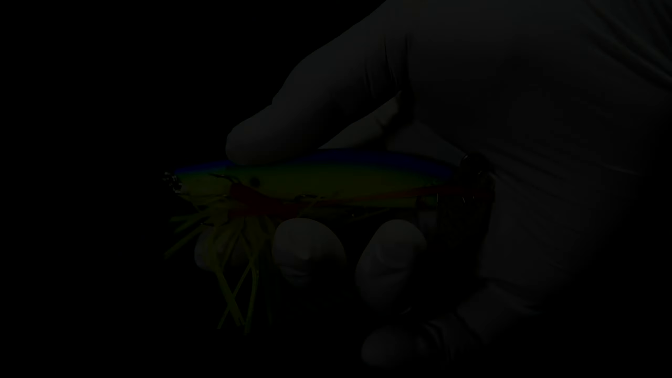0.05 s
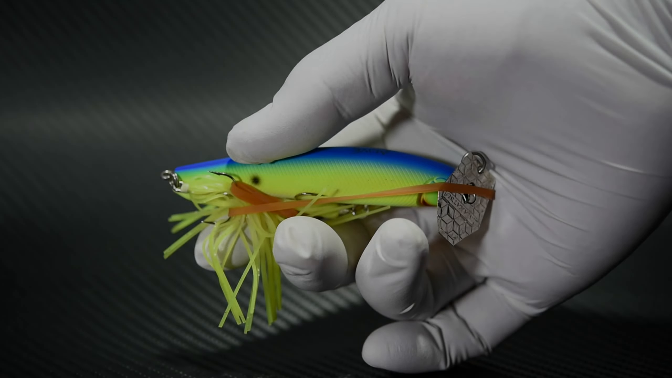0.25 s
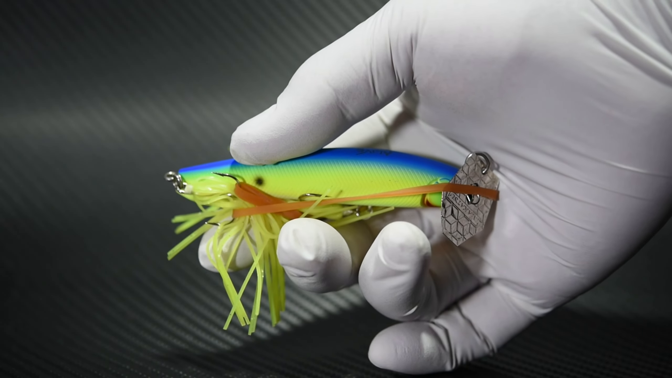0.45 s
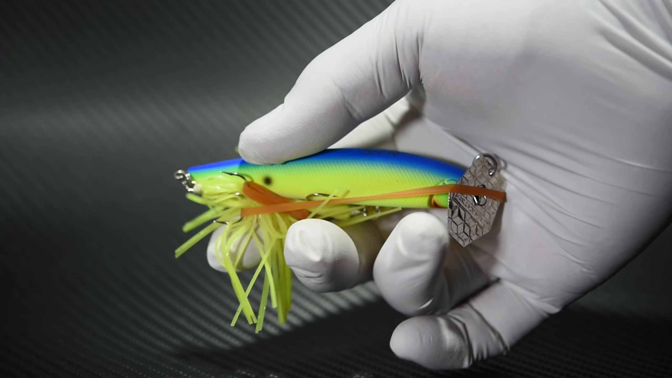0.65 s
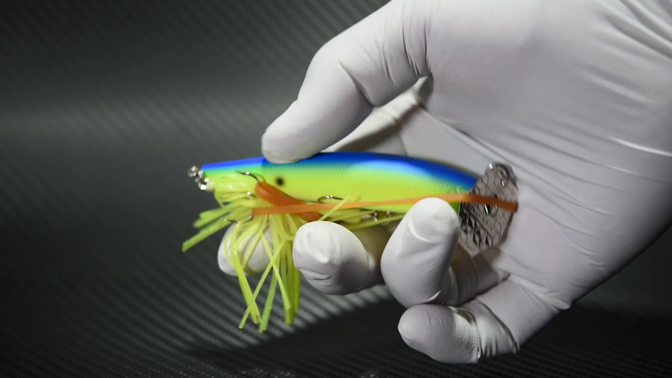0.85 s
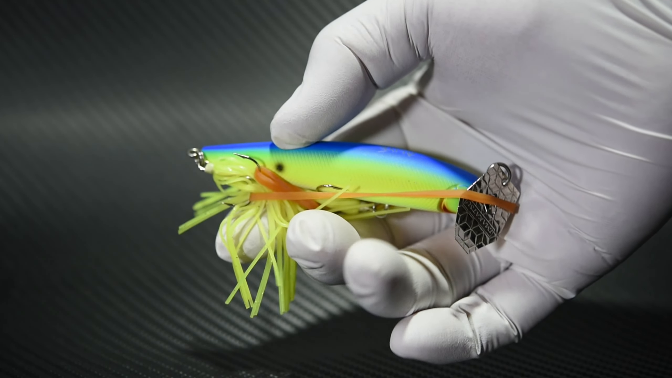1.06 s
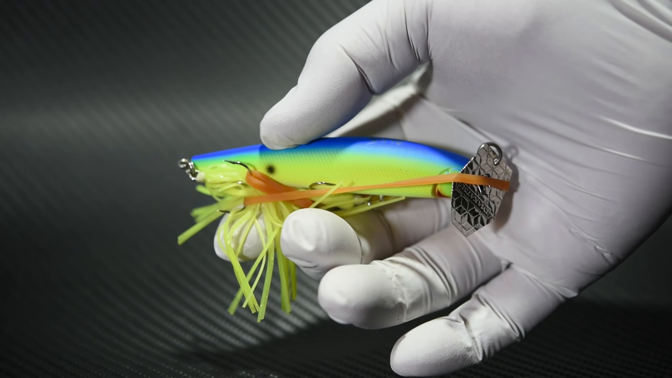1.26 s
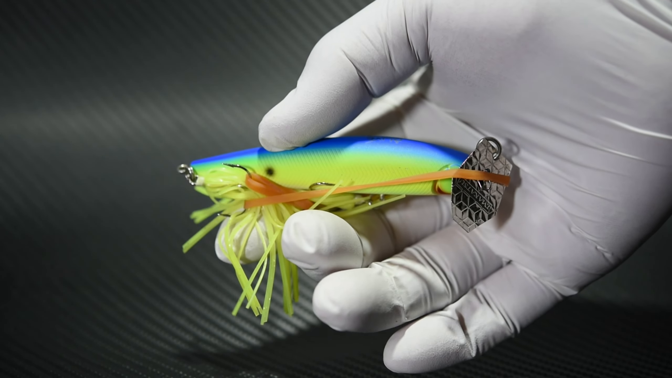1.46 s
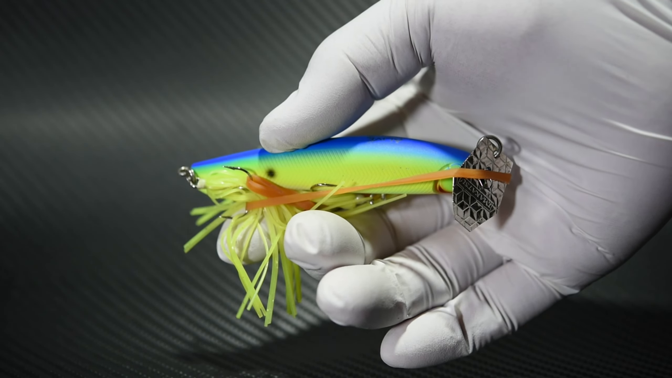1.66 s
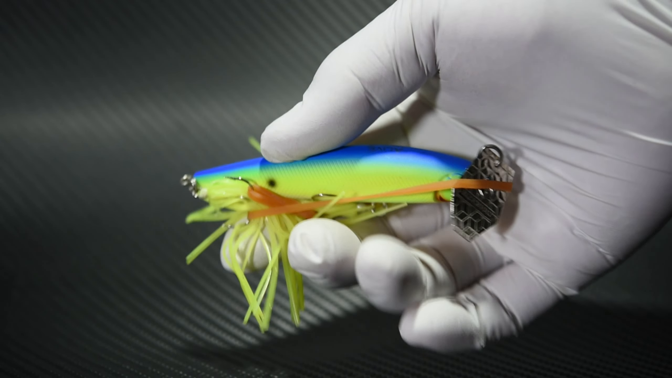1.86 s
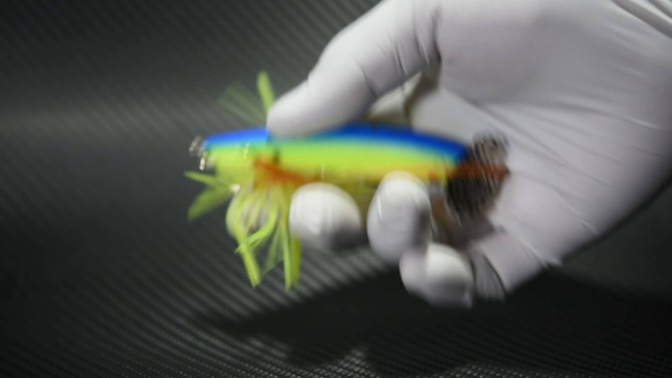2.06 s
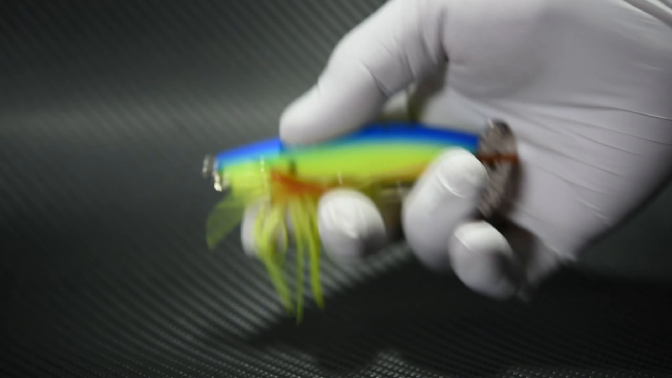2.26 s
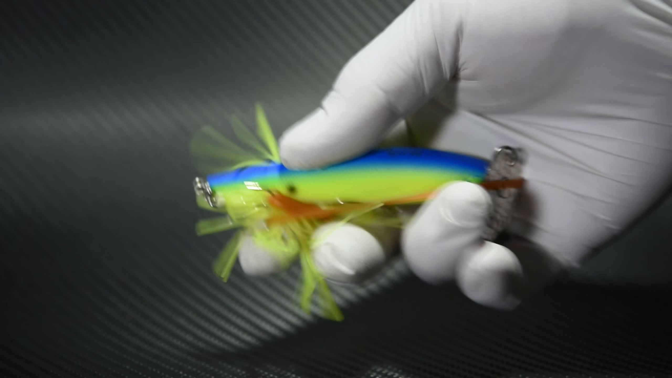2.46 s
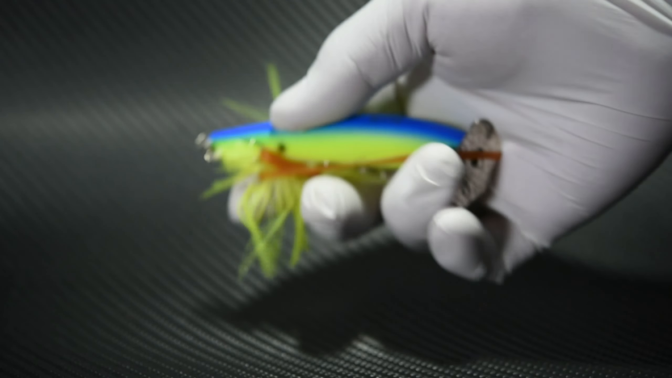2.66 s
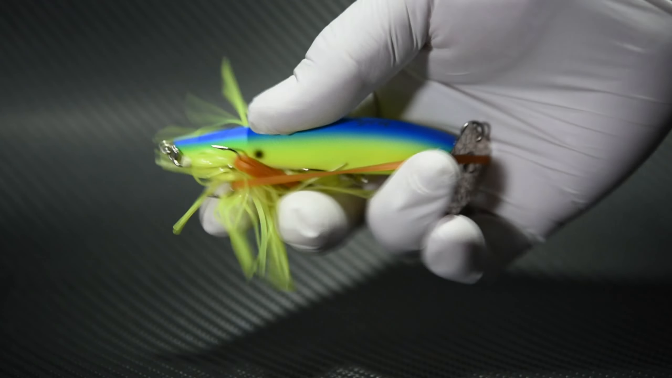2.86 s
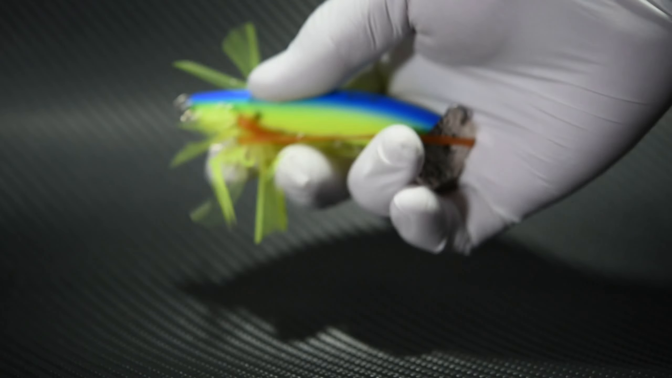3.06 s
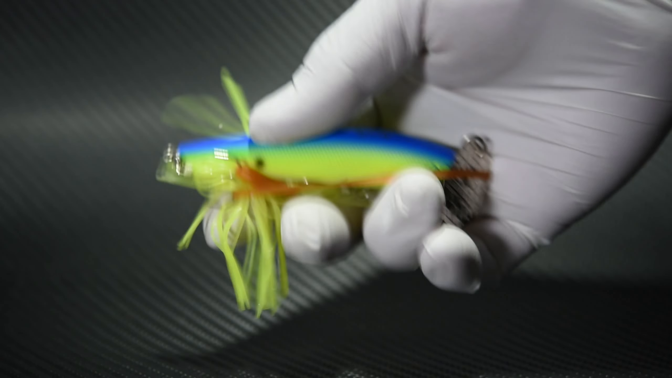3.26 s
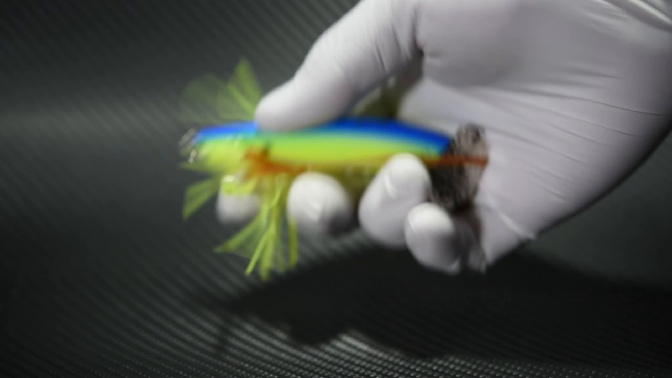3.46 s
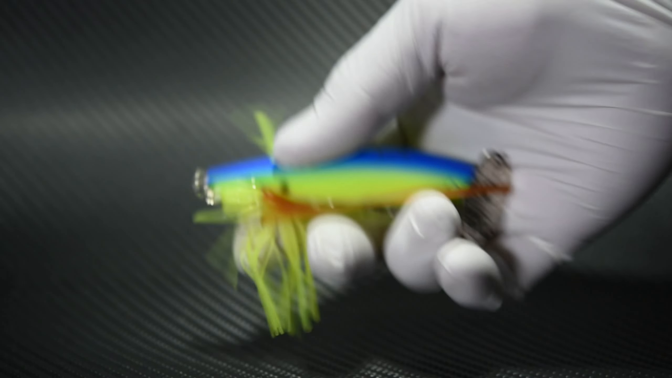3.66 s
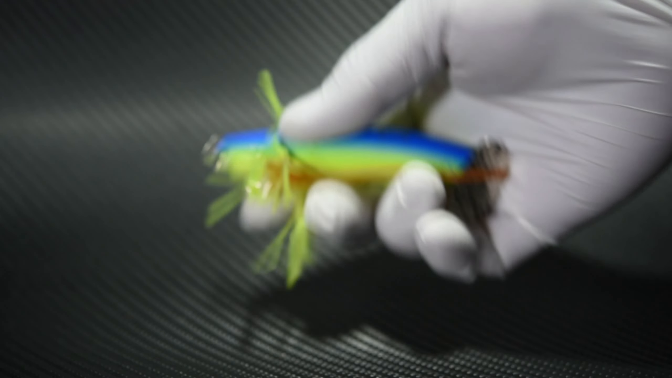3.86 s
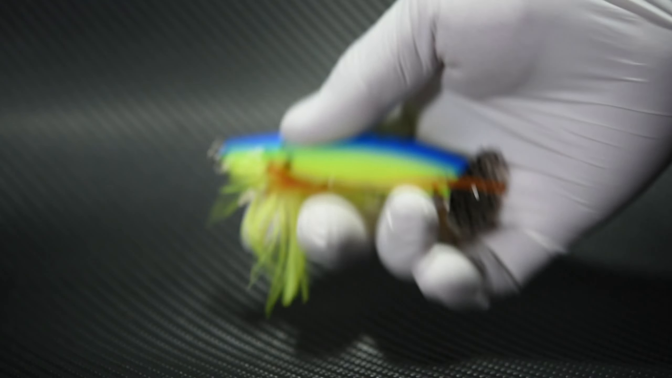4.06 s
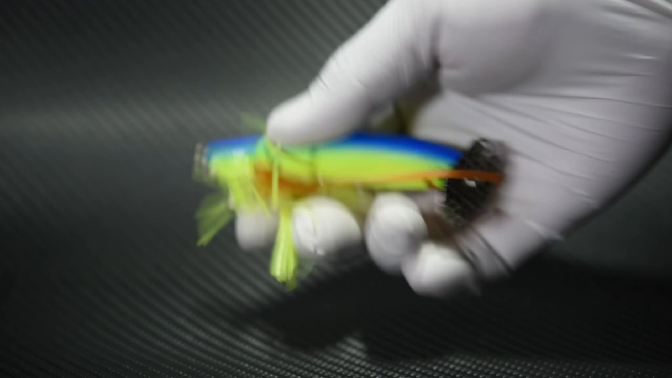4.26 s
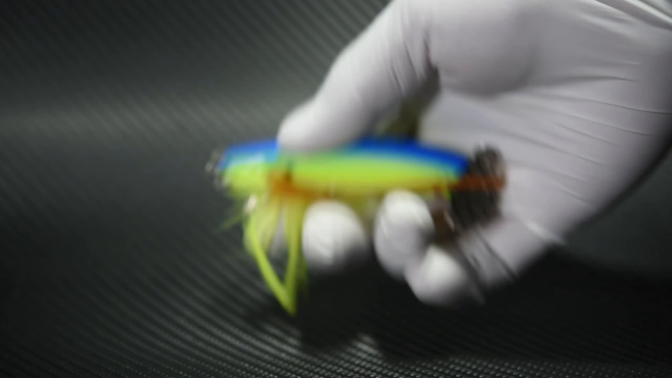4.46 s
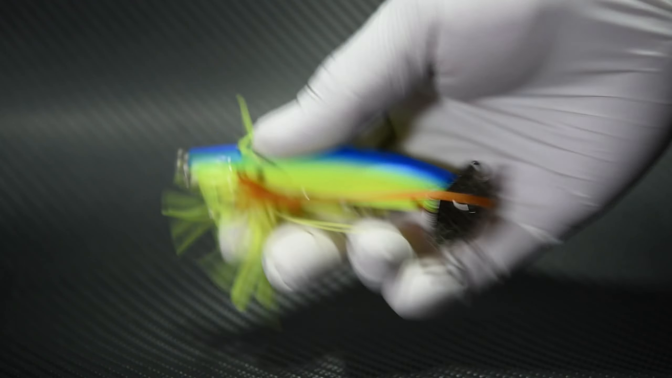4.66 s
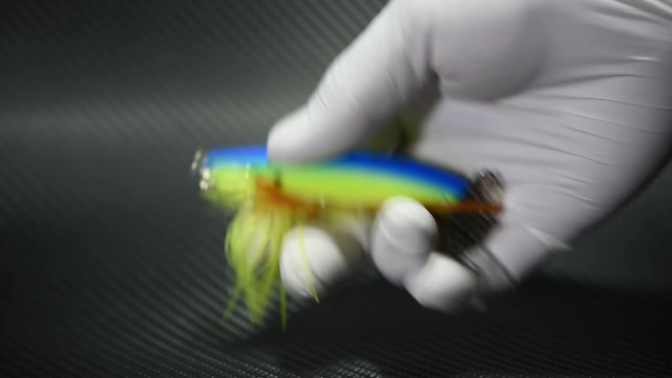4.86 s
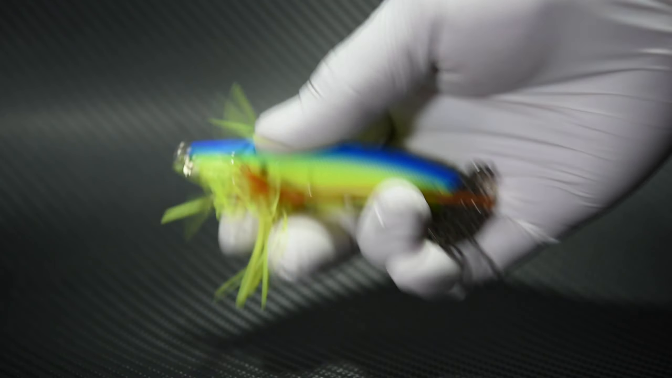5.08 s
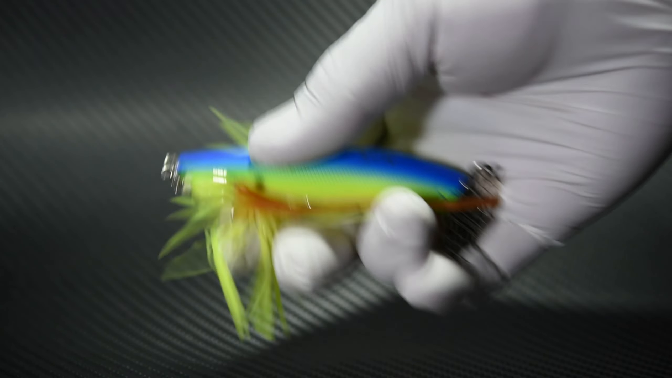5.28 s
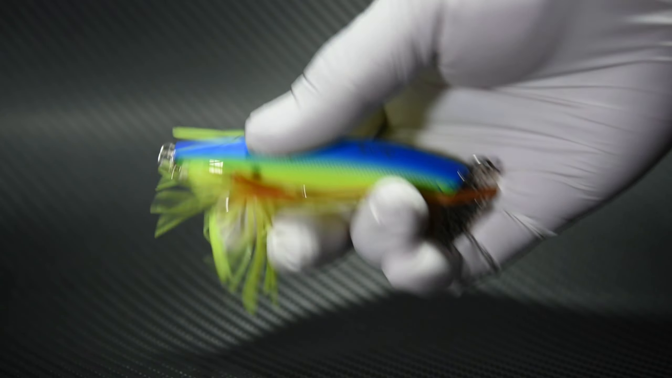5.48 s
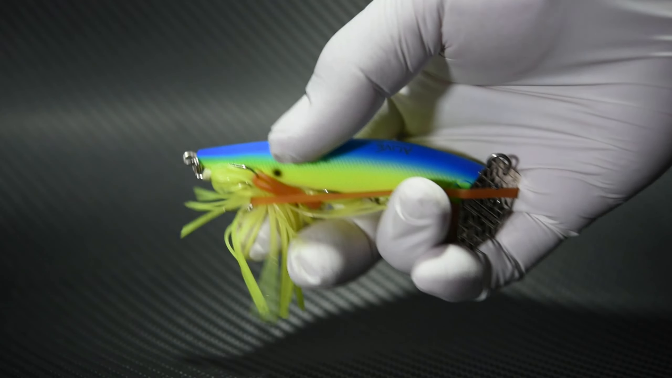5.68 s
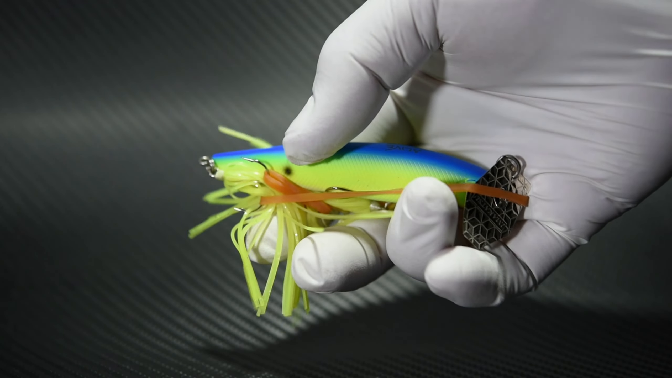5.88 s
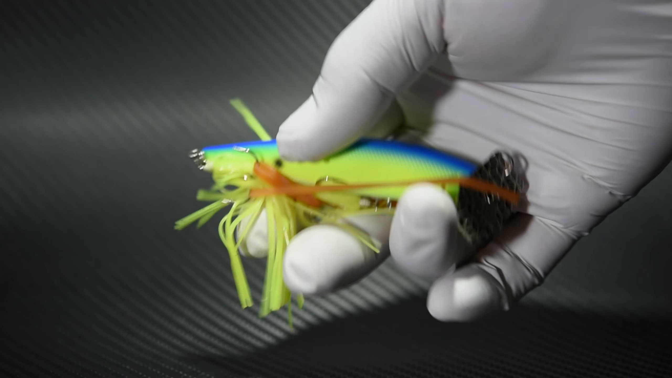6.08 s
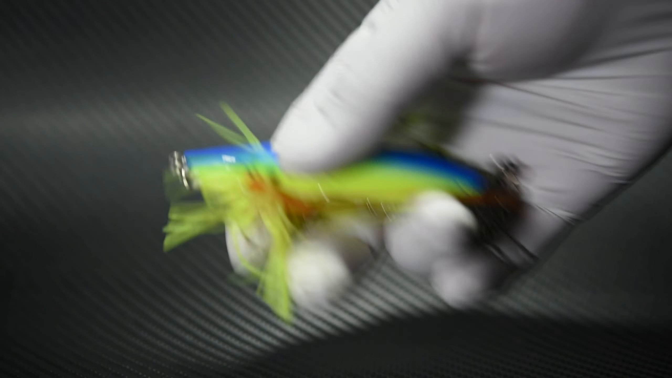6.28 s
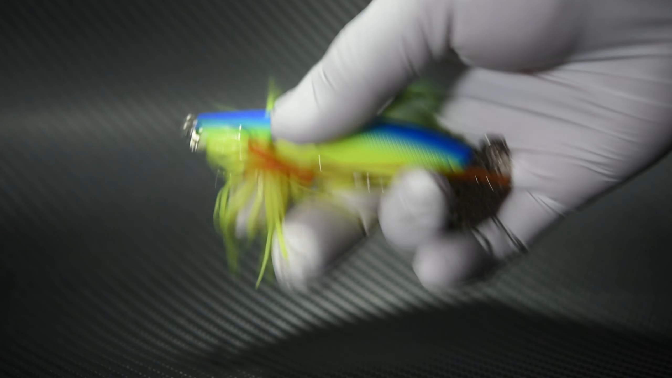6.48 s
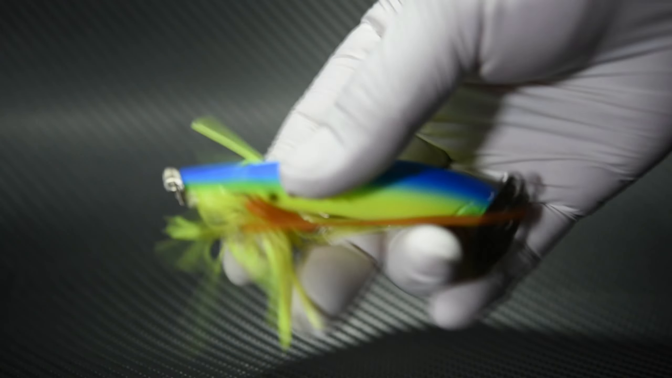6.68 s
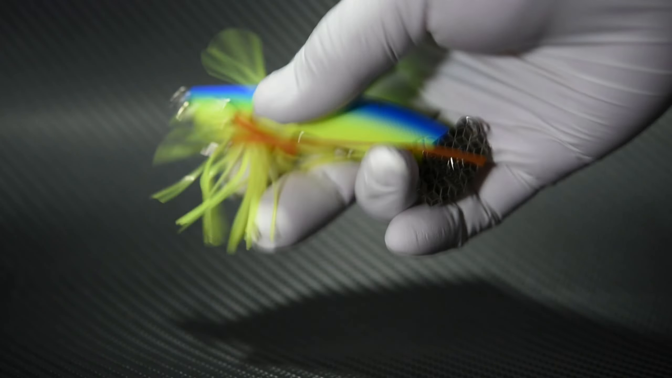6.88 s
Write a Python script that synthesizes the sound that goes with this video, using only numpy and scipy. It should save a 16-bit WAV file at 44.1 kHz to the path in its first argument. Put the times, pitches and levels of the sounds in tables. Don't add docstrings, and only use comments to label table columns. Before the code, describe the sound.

A small quiet room fades in with steady mains hum, fan rumble and hiss. Faint glove rustles pass, then at about two seconds a hollow plastic lure is shaken close up. Tight clusters of bright bead clicks land roughly fourteen times a second, alternating between ends, until a short pause. A few rustles and ticks lead into a second, similar rattle that runs to the end.

```python
import sys
import numpy as np
from scipy import signal
from scipy.fft import rfft, irfft
from scipy.io import wavfile
from scipy.ndimage import uniform_filter1d

SR = 44100
rng = np.random.default_rng(int(sys.argv[2]) if len(sys.argv) > 2 else 0)


def generate_wav(signal):
    frames = np.transpose(np.atleast_2d(signal))
    scaled = np.clip(frames, -1, 1) * 32767
    pcm = np.round(scaled).astype(np.int16)
    wavfile.write(sys.argv[1], SR, pcm)


def elevation(decibels):
    levels = np.asarray(decibels, float)
    return 10 ** (levels / 20)


N = 305613
LEAD_S = 0.015


def level(x, db):
    return x * elevation(db) / np.sqrt(np.mean(x ** 2))


def band(x, hz, width_hz):
    return signal.lfilter(*signal.iirpeak(min(hz, 0.45 * SR), hz / width_hz, fs=SR), x)


def walk(rate_hz):
    k = int(SR / rate_hz)
    steps = np.repeat(rng.standard_normal(N // k + 1), k)
    w = uniform_filter1d(uniform_filter1d(steps, k), k)[:N]
    return w / w.std()


def air():
    # (frequency [Hz], density [dB per Hz], left-right likeness [0-1])
    spectrum = [(20, -89.5, 0.1), (60, -87.5, 0.93), (135, -85, 0.87), (223, -73.5, 1), (468, -84.5, 0.41),
                (700, -89.5, 0.86), (1120, -84.5, 0.65), (2100, -87, 0), (3100, -85, 0), (8000, -87.5, 0),
                (10500, -92.5, .01), (14600, -107, .01), (16400, -110, 0.1)]
    hz, db, like = np.transpose(spectrum)
    log_f = np.log(np.fft.rfftfreq(N, 1 / SR) + 1)
    gain = elevation(np.interp(log_f, np.log(hz), db)) * np.sqrt(SR / 2)
    like = np.clip(np.interp(log_f, np.log(hz), like), 0, 1)
    mid, side = (irfft(rfft(rng.standard_normal(N)) * gain * np.sqrt((1 + sign * like) / 2), N)
                 for sign in (1, -1))
    return np.array([mid + side, elevation(-0.7) * (mid - side)]) * elevation(0.5 * walk(7))


def hum():
    # (frequency [Hz], rms level [dB], wobble [dB])
    lines = [(120, -54.5, .5), (180, -62.5, 1.2), (240, -53.5, .6), (268, -60.5, 2), (300.5, -62, 1),
             (360.5, -65, 1), (420, -67, 1), (480, -72, 0.5)]
    # (multiple of the blade rate [1], rms level [dB])
    blades = [(4, -67.5), (5, -71.5), (6, -65.5), (7, -66.5), (8, -66)]
    blade_hz = 192
    t = np.arange(N) / SR
    ear_phase = np.array([[0.08], [-0.08]])
    out = np.zeros((2, N))
    for hz, db, wobble_db in lines:
        gain = elevation(db + 2.5 + wobble_db * walk(8.2))
        phase = 2 * np.pi * (hz * t + rng.random()) + 0.18 * wobble_db * walk(6.5)
        out += gain * np.sin(phase + ear_phase)
    for multiple, db in blades:
        noise = rng.standard_normal(N) + 1.76 * rng.standard_normal((2, N))
        out += level(band(noise, multiple * blade_hz, 17.4), db)
    return out


def glove():
    # (time [s], length [s], centre [Hz], width [Hz], level [dB])
    rustles = [(.415, .004, 12000, 5000, -62), (.445, .004, 11000, 4000, -58),
               (.485, 0.0036, 12000, 6000, -48), (0.568, 0.043, 3100, 300, -56),
               (0.796, 0.028, 9500, 5000, -53), (1.722, 0.05, 10900, 4000, -57),
               (1.413, 0.028, 8000, 9000, -57), (1.872, 0.3, 1020, 900, -53.5),
               (1.909, .05, 4630, 700, -50), (1.973, 0.0039, 5900, 5960, -41),
               (5.932, 0.0045, 11000, 3000, -45), (5.951, 0.0027, 11500, 4000, -41),
               (5.956, .003, 11000, 4000, -39), (5.963, 0.25, 8500, 4000, -52.5),
               (5.983, 0.0027, 10500, 3000, -40), (6.058, .006, 4600, 2000, -43),
               (6.069, .003, 9000, 6000, -46), (6.028, .003, 13000, 4000, -52),
               (6.086, .003, 12000, 5000, -54), (6.135, 0.014, 8000, 4000, -42.5),
               (6.142, 0.003, 5300, 2500, -34.5), (2.993, .03, 1630, 300, -50.5)]
    out, t = np.zeros((2, N)), np.arange(N) / SR
    for s, length_s, hz, width_hz, db in rustles:
        a, b = int((s - 3 * length_s) * SR), int((s + 3 * length_s) * SR)
        noise = rng.standard_normal(b - a) + 0.56 * rng.standard_normal((2, b - a))
        noise = band(band(noise, hz, width_hz), hz, width_hz)
        puff = np.exp(-2 * ((t[a:b] - s) / length_s * 2) ** 2)
        out[:, a:b] += level(noise, db) * puff
    return out


def hand(s):
    # (time [s], brightness [dB], slackness [ratio])
    grip = [(2, -1, 1.15), (2.6, 1, 1.1), (3.1, -4, 1), (3.5, 1.5, .9), (4.2, 1, 1), (4.85, 3, .9),
            (5.4, -2, 1.2), (6.2, 2, .75), (6.9, -.6, .7)]
    times, bright_db, slack = np.transpose(grip)
    return np.interp(s, times, bright_db), np.interp(s, times, slack)


def strike(modes, tilt_db, apart, contact_s):
    scatter_db, detune = 5, 0.04
    hz, db, t60 = (c[:, None] for c in np.transpose(modes))
    t = np.arange(420) / SR
    chance = rng.standard_normal((4, len(modes), 1))
    tilt = tilt_db * np.tanh(np.log(hz / 6600) / 0.25)
    gain = elevation(db + tilt + scatter_db * chance[0])
    shift = 1 + detune * np.minimum(0.0067 / t60, 1) ** 2 * chance[1]
    phase = 2 * np.pi * hz * shift * t
    fall = gain * np.exp(-np.log(1000) * t / t60) * (1 - np.exp(-(t / contact_s) ** 2))
    fall = fall * (1 + 3 * np.exp(-t / (1.8 * contact_s)))
    turn = 0.3 + apart * (hz / 6600) ** 1.5 * chance[3]
    ears = np.array([np.sum(fall * elevation(sign * 2.36 * chance[2]) * np.sin(phase + sign * turn), 0)
                     for sign in (1, -1)])
    return ears / np.sqrt(np.mean(ears ** 2, 0).max())


def bead(s, knock_db):
    # (frequency [Hz], level [dB], t60 [s])
    shell_modes = [(3900, -12, 0.006), (4600, -7.5, 0.0033), (5600, 4.5, 0.0036), (6370, -1, 0.0052),
                   (7040, -11.5, 0.026), (7700, 1, 0.0062), (8500, 5.5, 0.0023), (9800, -2, 0.00039),
                   (10500, -32, 0.0012), (10880, -8, 0.002), (13600, -18, 0.0041)]
    # (frequency [Hz], level [dB], t60 [s])
    cavity_modes = [(2380, -3, .007), (2600, -.8, .007), (2880, -1.5, .006), (3250, -4, .004)]
    # (earliest [s], spread [s], level against it [dB])
    bounces = [
        (0, 0, 0),
        (-.0035, .003, -16),
        (.0008, .0016, -14),
        (.002, .004, -18),
    ]
    # (knock [dB], lowest radiated frequency [Hz])
    thinning = [(-19, 3570), (-25.5, 2200), (-9, 2180)]
    contact_s = 0.00012
    bright_db, _ = hand(s)
    out = np.zeros((2, 1800))
    for (lag_s, spread_s, less_db), when in zip(bounces, rng.random(len(bounces))):
        click = strike(shell_modes, bright_db, apart=0.18, contact_s=contact_s)
        i = int((LEAD_S + lag_s + spread_s * when - contact_s) * SR)
        out[:, i:i + click.shape[1]] += elevation(less_db) * click
    low_hz = np.interp(knock_db, *np.transpose(thinning))
    out = signal.lfilter(*signal.butter(4, low_hz, "high", fs=SR), out)
    knock = strike(cavity_modes, 0, apart=0.26, contact_s=0.0011)
    i = int(LEAD_S * SR)
    out[:, i:i + knock.shape[1]] += elevation(knock_db) * knock
    return out


def add(out, x, s, pan_db):
    i = int((s - LEAD_S) * SR)
    out[:, i:i + x.shape[1]] += x * elevation(np.array([[1], [-1]]) * pan_db / 2)


def landing(beads, s, db, length_ms, knock_db):
    lag_scatter, bead_scatter_db = 0.1, 2.5
    _, slack = hand(s)
    pile = np.zeros((2, 4000))
    chances = rng.standard_normal((len(beads), 2))
    for k, ((lag_ms, share, less_db), chance) in enumerate(zip(beads, chances)):
        late_s = (lag_ms * slack + share * length_ms) * (1 + lag_scatter * chance[0]) / 1000
        gain_db = less_db + (k > 0) * bead_scatter_db * chance[1]
        add(pile, elevation(gain_db) * bead(s, knock_db + 1.0), 2 * LEAD_S + late_s, 0)
    return pile * elevation(db - 1.13) / np.sqrt(2000 / SR * np.sum(pile.mean(0) ** 2))


def lure():
    # (time [s], energy [dB], pile-up length [ms], hollow knock against the click [dB])
    nose_landings = [(1.9948, -25, 4.2, -18.5), (2.128, -13.5, 5.6, -24.5), (2.275, -12, 6.9, -26.5),
                     (2.418, -13.5, 5.2, -21.5), (2.5555, -12.5, 4.7, -24), (2.6888, -12, 5.8, -25),
                     (2.8252, -12.5, 9.7, -24), (2.967, -13, 4.5, -26), (3.1079, -14, 6.1, -24),
                     (3.2436, -13.5, 5.4, -26), (3.3812, -11.5, 2.8, -23.5), (3.5185, -14, 3.2, -21),
                     (3.6545, -11.5, 4.0, -21), (3.7944, -14.5, 4.4, -20), (3.9291, -12, 3.6, -23.5),
                     (4.0684, -11.5, 3.0, -19.5), (4.202, -11.5, 6.9, -21.5), (4.3413, -10, 3.1, -21.5),
                     (4.4736, -13.5, 3.7, -18.5), (4.6066, -10, 5.1, -20), (4.7399, -8.5, 5.0, -24),
                     (4.8754, -7, 4.7, -22), (5.0094, -8.5, 2.13, -23), (5.1458, -11.5, 3.9, -19),
                     (5.2812, -13, 2.5, -21), (5.4234, -16.5, 3.3, -20), (5.5641, -18, 3.4, -22)]
    tail_landings = [(2.0462, -18.5, 2.8, -17), (2.196, -14, 4.7, -17), (2.3403, -13, 5.9, -18),
                     (2.4817, -15, 6.1, -14), (2.6189, -12.5, 9.6, -19), (2.7533, -14, 5.3, -20.5),
                     (2.892, -13, 4.4, -23.5), (3.0338, -13, 5.6, -20.5), (3.1719, -13, 3.9, -20),
                     (3.3085, -13.5, 4.2, -20), (3.4464, -12.5, 2.7, -21), (3.5818, -12, 5.6, -17.5),
                     (3.7205, -14, 5.3, -18), (3.8536, -13, 9.9, -14), (3.9914, -14.5, 4.8, -14),
                     (4.1331, -13.5, 9.4, -18), (4.2679, -13.5, 4.2, -14.5), (4.4071, -12, 4.2, -18.5),
                     (4.5392, -9.5, 6.7, -13), (4.6709, -10, 3.6, -16.5), (4.8029, -12, 4.1, -17),
                     (4.9373, -13.5, 5.8, -17), (5.0731, -12.5, 5.6, -15.5), (5.201, -12.5, 9.5, -14.5),
                     (5.3415, -13.5, 5.3, -21), (5.4807, -13.5, 4.8, -15.5), (5.6093, -13, 2.8, -19.5)]
    second_bout = [(6.2184, -10.5, 5.8, -31), (6.2848, -12, 5.4, -24), (6.3568, -7.5, 5.9, -31),
                   (6.4224, -12.5, 6.3, -18.5), (6.4994, -7.5, 5.3, -29.5), (6.57, -12.5, 9.1, -22.5),
                   (6.643, -9.5, 3.2, -27), (6.7087, -13.5, 3.7, -20), (6.7866, -10, 3.6, -34),
                   (6.8494, -12, 4.9, -22.5), (6.9261, -10.5, 2.8, -29)]
    # (fixed lag [ms], lag as share of the pile-up [ratio], level [dB])
    nose_beads = [
        (0, 0, 3),
        (-8.5, 0, -14),
        (-4.6, 0, -14),
        (.5, .3, -4),
        (0, .6, -5),
        (0, .85, -6),
        (.6, 1.05, -9),
    ]
    tail_beads = [
        (0, 0, 1),
        (-7, 0, -11),
        (-4, 0, -19),
        (.9, .05, -1.5),
        (0, .55, -7),
        (0, .95, -5),
        (1.5, 1.2, -13),
    ]
    # (time [s], peak level [dB])
    strays = [(2.0263, -28), (2.0351, -27), (3.4766, -40), (3.6162, -22), (4.0045, -19), (4.2278, -25),
              (4.2317, -24), (4.5006, -27), (4.5729, -26), (4.7099, -38), (4.832, -17.5), (4.9475, -24),
              (5.2417, -24), (5.3261, -26), (5.3582, -18), (5.3791, -25.5), (5.467, -27), (5.597, -24),
              (6.394, -23), (6.5369, -26), (6.7419, -32)]
    out = np.zeros((2, N + 4000))
    for rows, beads, pan_db in ((nose_landings + second_bout[::2], nose_beads, -1.8),
                                (tail_landings + second_bout[1::2], tail_beads, -1.5)):
        for row in rows:
            pan = pan_db + 1.5 * rng.standard_normal()
            add(out, landing(beads, *row), row[0] - LEAD_S, pan)
    for s, db in strays:
        add(out, elevation(db + 2) * bead(s, -24), s, -2.2)
    return signal.sosfilt(signal.butter(10, 2200, "high", fs=SR, output="sos"), out[:, :N])


def room(x):
    early_t60, early_db = 0.014, -13
    late_t60, late_db = 0.52, -15.0
    t = np.arange(SR // 2) / SR
    early, late = (rng.standard_normal(len(t)) + 0.49 * rng.standard_normal((2, len(t))) for _ in range(2))
    early = early * np.exp(-np.log(1000) * t / early_t60) * (1 - np.exp(-t / 0.002))
    late = band(late, 4800, 17500) * np.exp(-np.log(1000) * t / late_t60) * (1 - np.exp(-t / 0.0011))
    tail = (level(early, early_db) + level(late, late_db)) / np.sqrt(len(t))
    return signal.fftconvolve(x.mean(0, keepdims=True), tail, axes=1)[:, :N]


def scene():
    beads = lure()
    return beads + room(beads) + glove() + hum() + air()


def band_limit(x):
    return signal.sosfilt(signal.butter(12, 16510, fs=SR, output="sos"), x)


def record(dry):
    # (time [s], level [dB])
    fade_in = [
        (0, -44),
        (.09, -53.5),
        (0.362, 1),
    ]
    fade = elevation(np.interp(np.arange(N) / SR, *np.transpose(fade_in)))
    heard = signal.sosfilt(signal.cheby2(10, 40, 16400, fs=SR, output="sos"), dry)
    return band_limit(heard * fade)


dry = scene()
out = record(dry)
generate_wav(out)
```